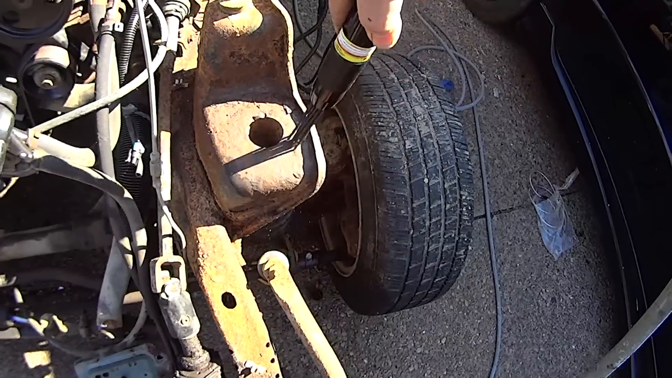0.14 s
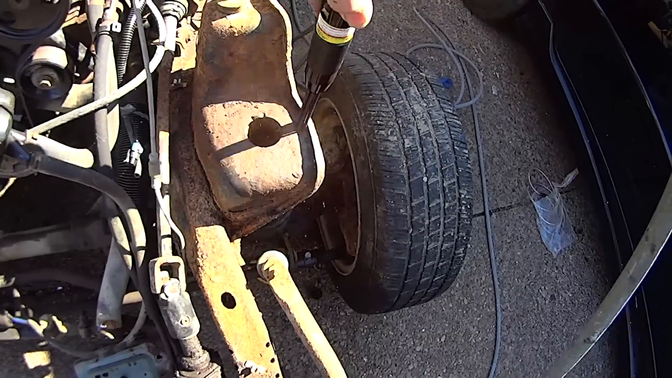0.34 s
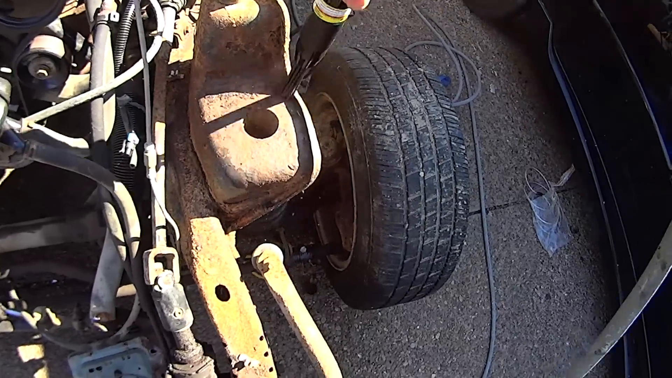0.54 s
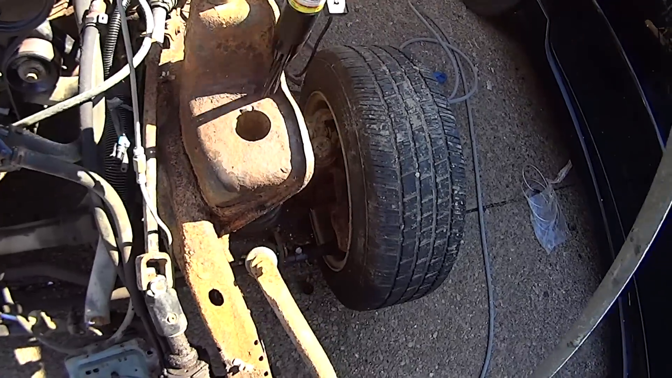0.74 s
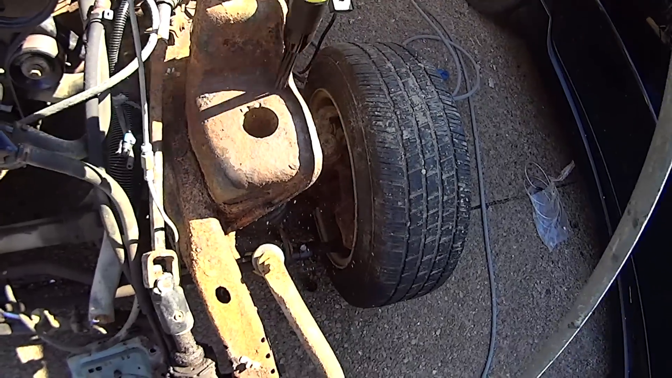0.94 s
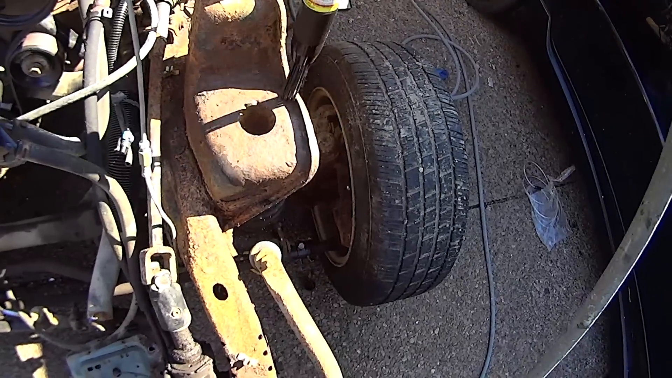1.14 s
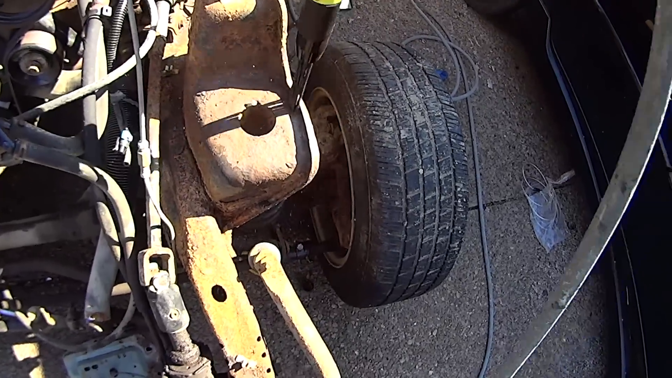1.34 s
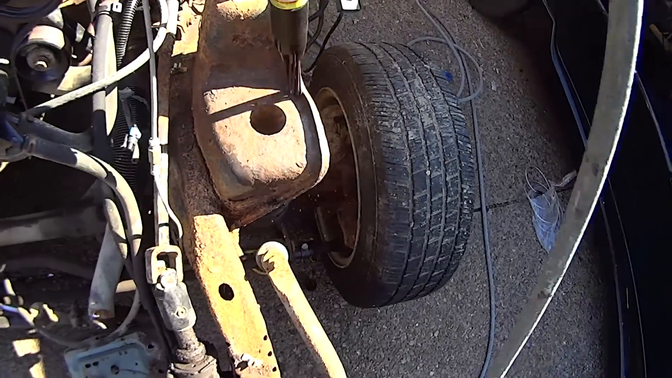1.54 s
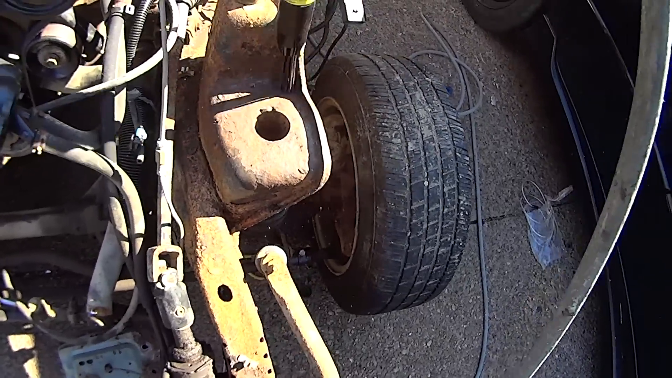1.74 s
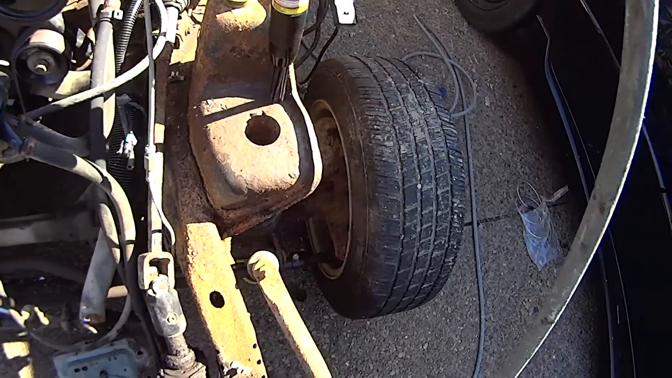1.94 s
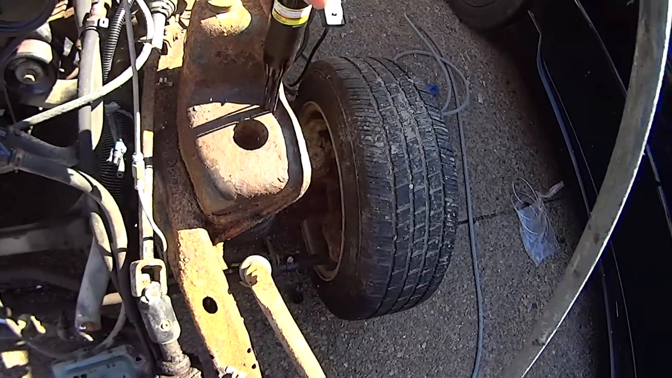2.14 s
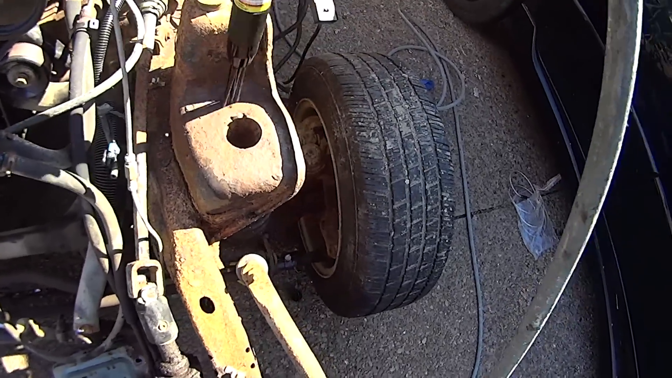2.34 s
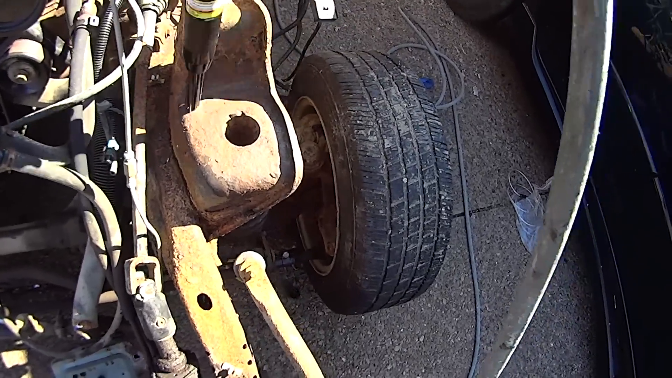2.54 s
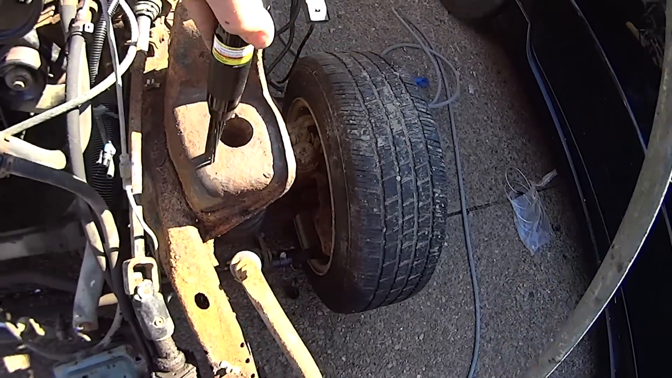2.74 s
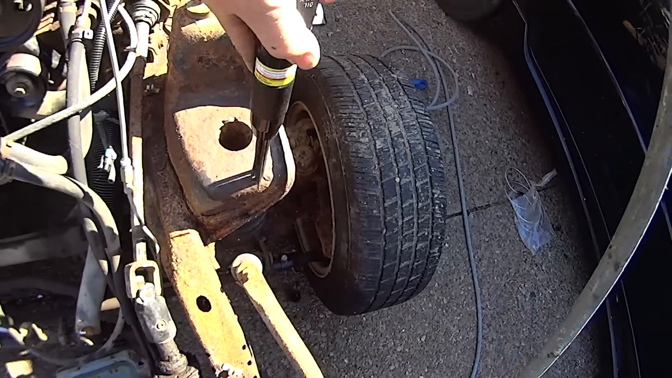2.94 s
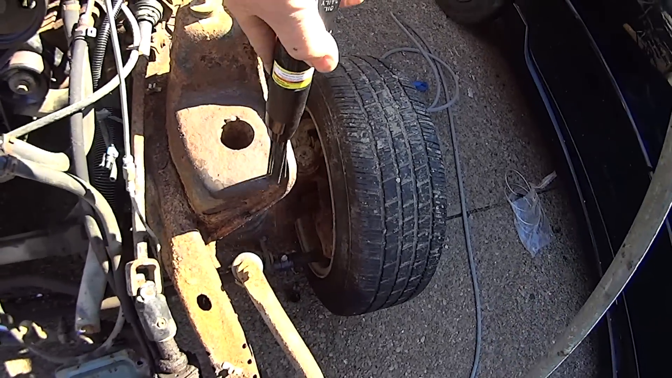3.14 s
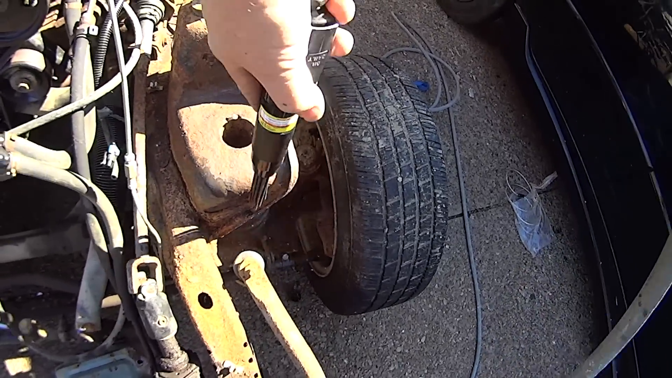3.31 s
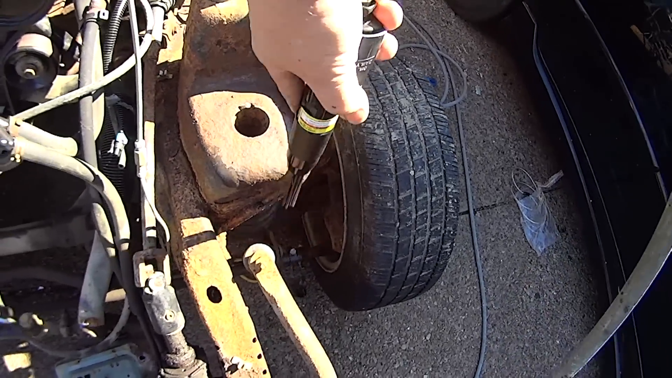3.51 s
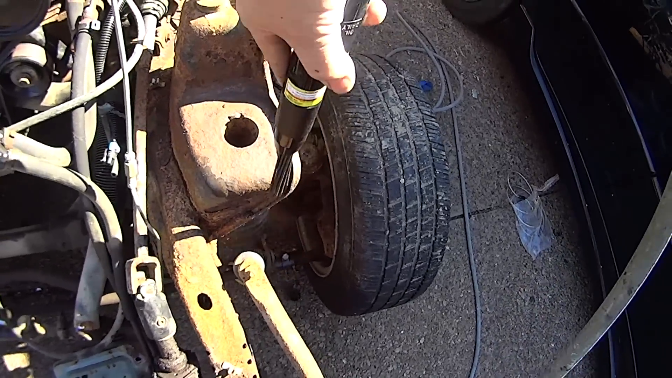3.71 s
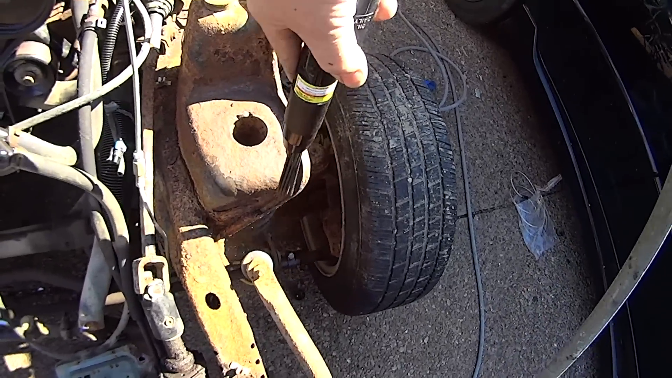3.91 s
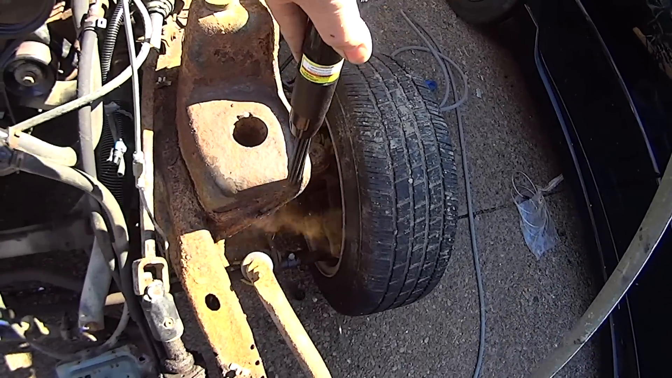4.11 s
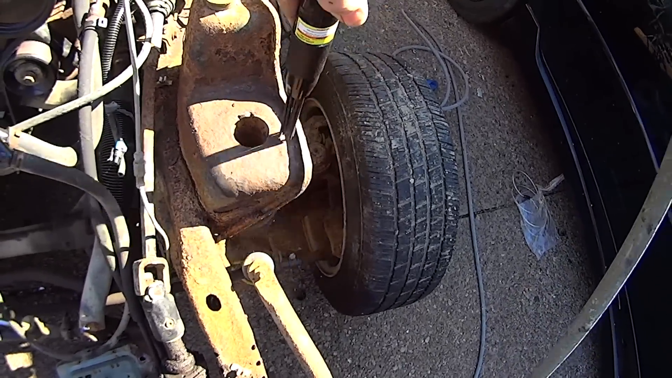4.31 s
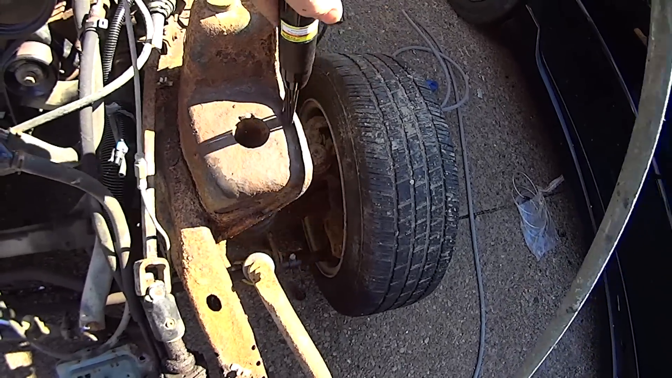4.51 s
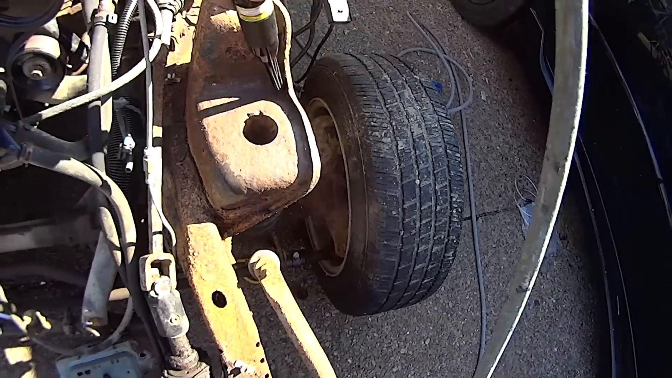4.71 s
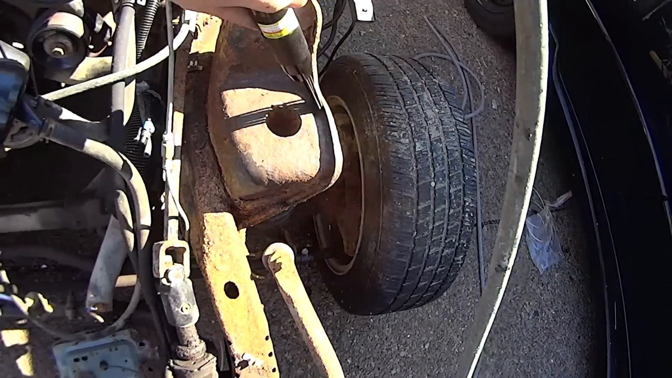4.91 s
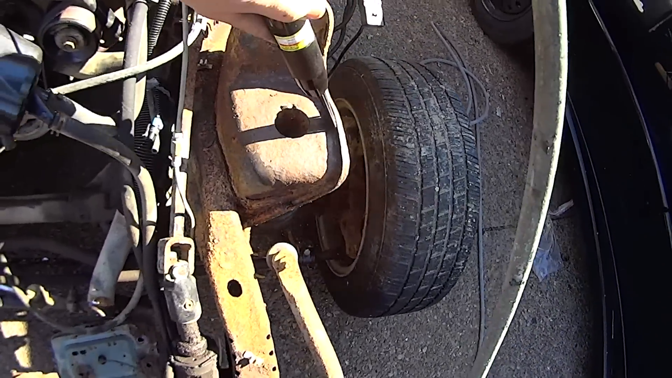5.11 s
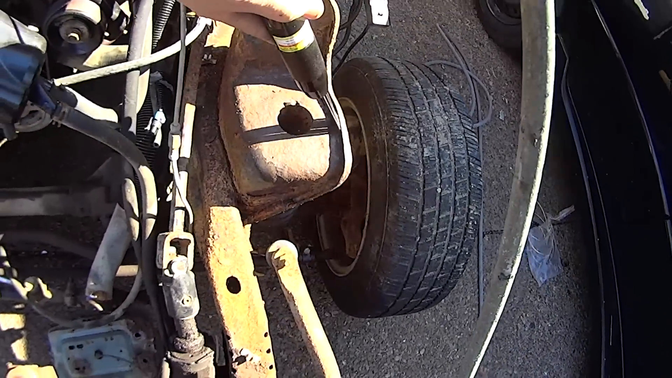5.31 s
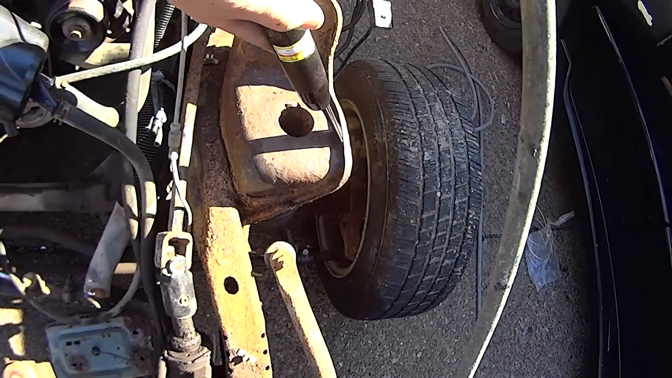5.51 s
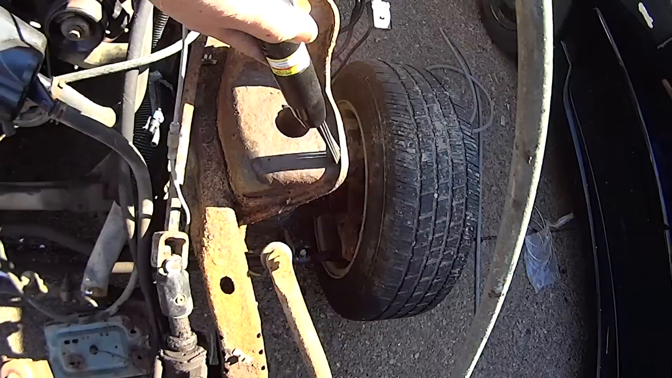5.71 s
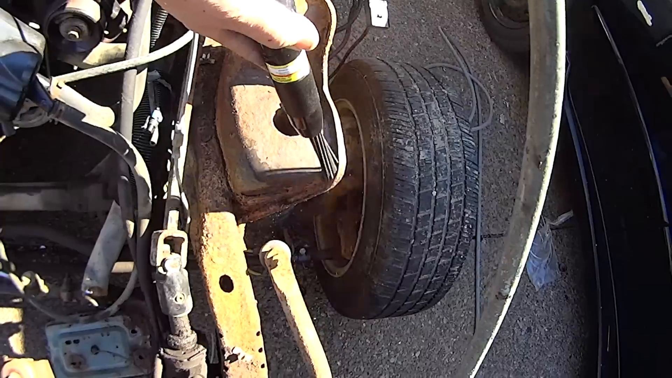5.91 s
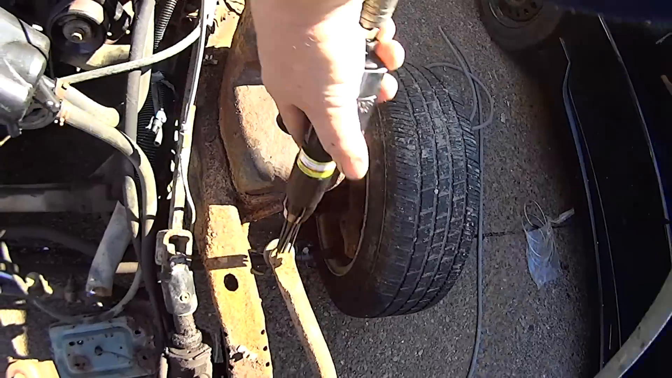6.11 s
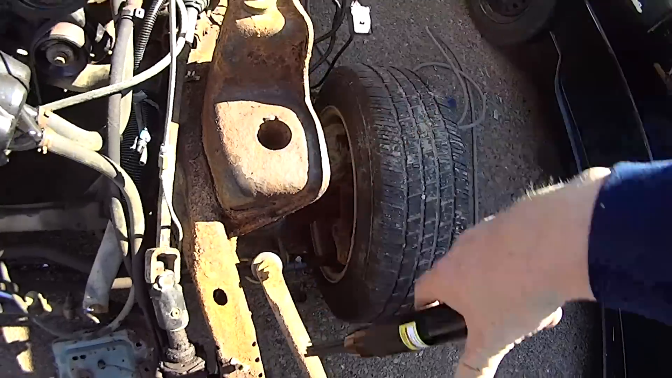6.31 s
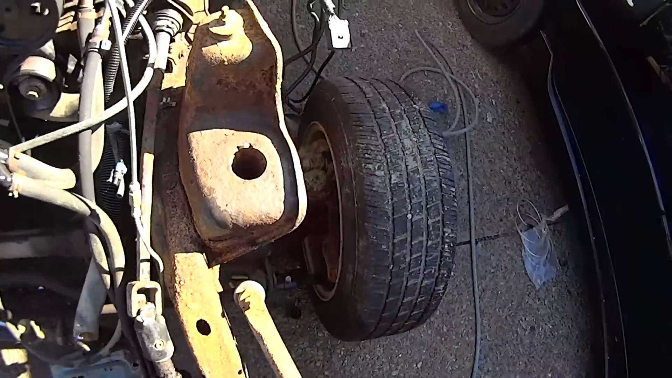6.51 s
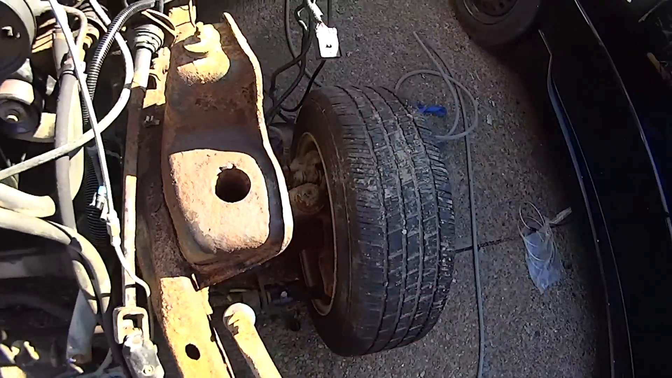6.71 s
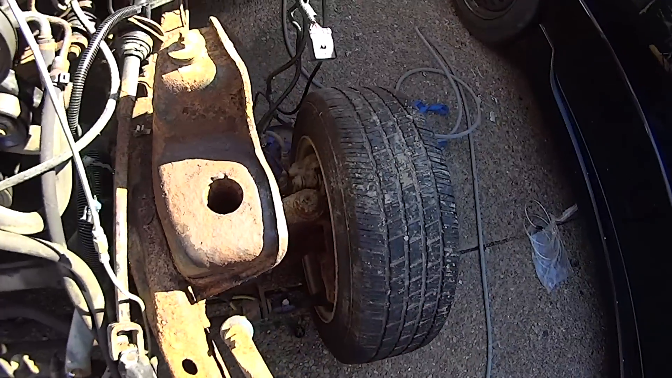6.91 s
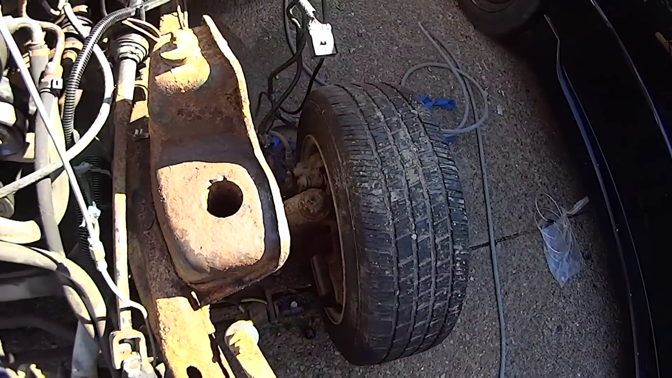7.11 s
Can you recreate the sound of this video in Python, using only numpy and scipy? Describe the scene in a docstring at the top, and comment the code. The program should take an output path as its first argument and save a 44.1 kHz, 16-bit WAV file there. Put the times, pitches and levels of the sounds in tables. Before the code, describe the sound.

An air-driven needle tool chips rust from steel, loud and close. Noisy, hissy metallic chatter runs first, then firm contact brings a rapid hammering drone with the bracket humming and singing. Its tone shifts as it moves over the metal. After six seconds it quits with a brief clink and ring; quiet leaking air, a faint whistle, low buffets and dull camera ticks remain. The surroundings answer only briefly.

```python
"""A pneumatic needle scaler chips rust off a steel vehicle frame, close to a hand-held camera.
Its piston runs at nearly 80 strokes/s: needle contacts ring tool and frame, piston pushes shake body and bracket.
Loose needles first chatter in a dense rasp; pressed home, they hammer in step and the frame rings.
The tool stops with clinks (decaying sines and noise); air seeps on (filtered noise, a whistle, a hum).
Low buffets, bumps and ticks follow as the camera is moved."""
import sys
import numpy as np
from scipy import signal
from scipy.fft import rfft, irfft, next_fast_len
from scipy.io import wavfile
from scipy.ndimage import map_coordinates

SR = 44100
rng = np.random.default_rng(int(sys.argv[2]) if len(sys.argv) > 2 else 0)


def file_out(sig):
    """Save sig as 16-bit WAV at sys.argv[1]."""
    # one column per channel
    cols = np.atleast_2d(sig).T
    # limit, then scale
    lim = np.clip(cols, -1, 1)
    pcm = np.round(lim * 32767).astype(np.int16)
    wavfile.write(sys.argv[1], SR, pcm)


N = 315315

# piston speed: time_s, strokes_per_s
PISTON_SPEED = [(0.0, 77.3), (0.15, 79.46), (0.7, 80.79), (1.05, 78.4), (1.55, 80.5), (1.67, 76.45),
                (1.85, 78.84), (3.14, 78.35), (3.2, 74.9), (3.29, 74.3), (3.32, 75.7), (3.61, 75.5),
                (3.8, 74.2), (3.83, 75.8), (4.04, 75.7), (4.08, 77.9), (4.13, 73.5), (4.17, 77),
                (4.24, 75.9), (4.28, 72.8), (4.33, 72), (4.37, 74.5), (4.48, 73.6), (4.55, 77.9),
                (4.76, 77.6), (4.91, 75.6), (4.96, 77.1), (5.09, 75.4), (5.68, 74.7), (5.81, 76.1),
                (6.07, 75.9), (6.13, 74.4), (6.24, 75)]
# pressing home: time_s, in_step_energy_share (0-1), late_bounce_share of that (0-1)
PRESSURE = [(0, 0.05, 0.77), (3.115, 0.02, 0.9), (3.13, 0.72, 0.55), (3.25, 0.9, 0.24), (3.29, 0.8, 0.03),
            (4.2, 0.84, 0.17), (4.3, 0.77, 0.53), (4.9, 0.82, 0.33), (5.45, 0.77, 0.31), (5.92, 0.81, 0.32),
            (6.05, 0.78, 0)]
# first echo null, lower as the tool moves from the bracket's top to its edge: time_s, null_hz
ECHO_NULL = [(0, 1120), (.3, 1270), (2.6, 1380), (3.1, 1030), (3.35, 680), (4.05, 676), (4.6, 1160),
             (5.2, 1320), (5.95, 967), (6.1, 650)]

# needle spectrum: freq_hz, density_db_per_hz
NEEDLE_SPECTRUM = [(120, -25.5), (300, -11.5), (450, -12), (800, -3.5), (1400, -9), (2200, -4.5),
                   (3000, -2.5), (4000, 2), (4900, 3.5), (5900, 4.5), (7000, 2), (8000, 2), (8800, -0.5),
                   (9700, -2.5), (11000, -7.5)]
# single needle shafts: freq_hz, width_hz, level_db
SHAFT_MODES = [(4460, 110, -6.5), (4620, 82, -6.5), (4980, 180, -2), (5180, 90, -1.5), (6140, 69, -4.5),
               (6860, 94, -2), (6920, 99, -5.5), (8160, 110, 1)]
# crack of a firm blow on steel: freq_hz, width_hz, level_db
CRACK_MODES = [(1540, 1600, -2), (2143, 450, 9.5)]
# barrel: freq_hz, width_hz, level_db
BARREL_MODES = [(7680, 134, -1.3), (10245, 195, -0.22)]
# needle sleeve: freq_hz, width_hz, level_db
SLEEVE_MODES = [(5500, 83, 4.3), (5810, 110, 0.5), (5850, 190, -1.3)]
# needles rub in the sleeve: middle_s, length_s, level_db
SLEEVE_RUBS_TABLE = [(.05, 0.32, -38), (2.75, 0.52, -43.5), (3.2, .16, -45), (3.85, 0.59, -43),
                     (4.35, 0.24, -36), (5.85, 0.18, -40)]

# frame rail, wall: freq_hz, width_hz, level_db
RAIL_WALL_MODES = [(1630, 67, 1), (1743, 22, 12.9), (1882, 59, 4.8), (1964, 49, 4), (2167, 77, 6.9),
                   (2196, 45, 8.4), (2570, 57, 1.3), (2610, 46, 1)]
# frame rail, corner: freq_hz, width_hz, level_db
RAIL_CORNER_MODES = [(1500, 87, 5), (1641, 18, 10), (1870, 62, 11.5), (2065, 37, -1), (2298, 57, 13),
                     (2520, 38, 13)]
# contact place on the rail: time_s, place (0 wall, 1 corner)
RAIL_CONTACT = [(2.65, 0), (2.9, 1), (4.35, 0.96), (4.6, 0), (5.05, 0.24), (5.35, 0.72)]
# needles bite into the rail: middle_s, length_s, level_db
RAIL_BITES_TABLE = [(.18, 0.054, -41), (.35, 0.067, -39.5), (.47, 0.023, -41.5), (.61, 0.028, -41),
                    (.82, 0.21, -45), (1.0, 0.082, -40), (1.17, 0.075, -41.5), (1.38, 0.024, -36),
                    (1.5, 0.049, -42), (1.59, 0.05, -40.5), (1.72, 0.043, -41.5), (1.81, 0.036, -42),
                    (2.01, 0.048, -40), (2.1, .04, -41), (2.18, 0.029, -39.5), (2.29, 0.26, -44),
                    (2.46, .05, -40), (2.57, 0.041, -41.5), (3.02, .17, -39), (3.155, 0.072, -29.5),
                    (3.24, 0.052, -32), (4.295, 0.038, -30.5), (4.82, 0.32, -36), (5.48, 0.14, -49),
                    (5.74, 0.14, -34.5), (5.862, 0.03, -28.5), (5.94, 0.076, -33.5)]
# bracket lip: freq_hz, width_hz, level_db
LIP_MODES = [(3148, 70, 8), (3345, 90, 8.5), (3498, 80, 2)]
# bracket flank: freq_hz, width_hz, level_db
FLANK_MODES = [(2970, 48, 0), (3060, 59, 1), (3540, 29, 3.5), (3640, 22, -8)]
# needles catch the bracket rim: middle_s, length_s, level_db
RIM_BITES_TABLE = [(.26, 0.073, -36.5), (.56, 0.43, -39), (1.33, .09, -35.5), (1.5, 0.21, -39),
                   (1.96, 0.064, -39.5), (2.14, 0.062, -39), (3.16, 0.15, -39.5), (4.56, 0.31, -31),
                   (5.22, 0.45, -39), (5.75, 0.4, -39.5)]

# thud of the tool's body: freq_hz, density_db_per_hz
BODY_SPECTRUM = [(35, -52), (76, -9.5), (115, -12), (152, -2.5), (228, 3.5), (300, 1), (380, 2),
                 (455, 11.5), (530, 4), (605, -7), (760, -2), (950, -28), (1300, -22.5), (3000, -83)]
# bracket top: freq_hz, width_hz, level_db
BRACKET_MODES = [(530, 73, 7.5), (643, 50, 2.5)]
# bracket's flat face: freq_hz, width_hz, level_db
FACE_MODES = [(974, 42, 2), (1076, 76, 4), (1172, 52, 0), (1242, 35, 2)]
# needles drum on the face: middle_s, length_s, level_db
FACE_DRUMS_TABLE = [(3.47, 0.12, -42.5), (4.82, 0.26, -37.5)]
# bracket's outer edge: freq_hz, width_hz, level_db
EDGE_MODES = [(518, 44, 4.5), (768, 17, 11), (900, 18, -9), (1208, 63, -1), (1480, 210, -12.5),
              (3135, 59, 5)]
# needles slip off the bracket, which falls quieter: middle_s, length_s, gain_db
BRACKET_SLIPS = [(0.083, 0.19, -5), (2.927, 0.35, -3.5)]
# bracket hum while the tool is seated on it: time_s, level_db
SEATED_HUM = [(4.45, -65), (4.57, -50), (4.85, -44.5), (5.1, -44.5), (5.5, -47), (5.95, -46.5), (6.12, -49)]
# seated hum: freq_hz, width_hz, level_db
SEATED_MODES = [(542, 40, -7), (611, 30, 0)]
# bracket's plate sings under the seated tool, higher as it moves in: time_s, pitch_hz, level_db
PLATE_SONG = [(4.25, 930, -73), (4.4, 950, -49), (4.6, 975, -52), (4.85, 1032, -54), (5.1, 1020, -40.5),
              (5.5, 1030, -51), (5.85, 1020, -49), (6.1, 990, -56)]

# needles settle: time_s, relative_db
CLINK_EVENTS = [(6.232, -22.5), (6.24, -33), (6.294, -26.5), (6.315, -38)]
# needle bundle in the clinks: freq_hz, level_db, t60_s
BUNDLE_MODES = [(775, 3, .07), (1200, 1, .04), (3380, -5, .035), (5290, -2, .028), (6200, -9, .025),
                (7725, -8, .055), (10260, -10, .055)]
# barrel rings out once the needles are free: freq_hz, relative_db, t60_s
RING_OUT_MODES = [(7690, -27, 0.11), (10220, -26, 0.085)]

# seeping air: freq_hz, density_db_per_hz
SEEP_SPECTRUM = [(180, -47), (300, -23), (437, -9), (532, -17), (836, -11), (1350, -15.5), (1720, -11),
                 (2190, -6.5), (3060, -13.5), (6020, -10.5), (7550, -8.5), (9600, -8.5), (11000, -12),
                 (14300, -40), (22000, -120)]
# leak hiss shifts in pitch as the pressure settles: time_s, center_hz, db_re_seep
LEAK_HISS = [(6.33, 10000, 0), (6.42, 9000, -5), (6.49, 7250, -2), (6.62, 7540, -5), (6.85, 7900, -14),
             (7.0, 8400, -4), (7.15, 8400, 1)]
# air buffets the microphone: middle_s, length_s, gain_db
BUFFET_SWELLS = [(6.735, 0.069, -55), (6.96, 0.083, -53), (7.09, .06, -47), (7.14, .04, -56)]
# buffet rumble: freq_hz, density_db_per_hz
RUMBLE_SPECTRUM = [(20, -16), (50, 3), (120, 8.5), (200, 6.5), (300, -0.5), (450, -10), (700, -33),
                   (1500, -47)]
# soft handling bumps: time_s, start_db, pitch_hz
HANDLING_BUMPS = [(6.674, -42, 200), (6.693, -37, 260), (6.708, -38, 170), (6.724, -44, 150),
                  (6.734, -39, 196), (6.765, -46, 220), (6.925, -49, 160), (6.949, -42, 170),
                  (6.966, -36, 191), (6.992, -42, 160), (7.073, -38, 200), (7.094, -31, 130),
                  (7.103, -32, 150)]
# small dull ticks: time_s, level_db
HANDLING_TICKS = [(6.722, -52), (6.818, -53), (6.912, -40)]
# tick spectrum: freq_hz, density_db_per_hz
TICK_SPECTRUM = [(400, -8), (700, 0), (850, 6), (1000, -6), (1300, -1), (1800, -26), (4000, -45)]

# microphone ports, level: freq_hz, left_minus_right_db
PORT_TILT = [(100, -1.5), (260, -1), (450, 1), (700, 1.5), (900, 2.5), (1500, 3), (2100, 4.5), (2800, 1.7),
             (5000, -0.5), (11000, 0.5)]
# microphone ports, phase: freq_hz, left_lead_rad
PORT_LEAD = [(80, 0.36), (200, 0.35), (350, 1), (600, 0.48), (780, 0.91), (1100, 0.34), (1600, 0.11),
             (2200, 0)]
# stereo width of the diffuse sound, opposite in left and right, very narrow at 5.5-8 kHz: freq_hz, gain_db
WIDTH_GAIN = [(100, -21), (550, -18), (850, -8), (1800, -11.5), (3700, -13), (5500, -44), (7900, -44),
              (8500, -22), (11000, -13.5)]
# garage decay: freq_hz, t60_s
GARAGE_T60 = [(200, 0.37), (2000, 0.063), (10000, 0.039)]

# _DB: with loose needles; _PRESS_DB: added by full pressure
NEEDLE_DB, NEEDLE_PRESS_DB = -32, 2.5
BOUNCE_DB = 9.5  # added under full pressure when all blows are late bounces
SHAFTS_DB, SHAFTS_VARY_DB = -14.5, 3  # against the bundle; spread of the wander's knots
BARREL_DB, BARREL_PRESS_DB = -39.5, 7
BARREL_EDGE_DB, BARREL_WAVER_DB = 1, 1.2  # added on the bracket's edge; spread of the waver's knots
SLEEVE_DB, SLEEVE_PRESS_DB = -56, 10
RAIL_DB, RAIL_PRESS_DB = -49.5, 1.5
LIP_DB, LIP_PRESS_DB = -49, -3
BODY_DB, BODY_PRESS_DB = -47.5, 8
BRACKET_DB, BRACKET_PRESS_DB = -47.5, 9.5
FACE_DB, FACE_PRESS_DB = -51.5, -6
EDGE_DB, EDGE_PRESS_DB = -48.5, 13
OUTWARD_DB = -3.5  # change of bracket top and face with the needles out on the edge
EDGE_NULL_HZ, TOP_NULL_HZ = 620, 1210  # echo null on the edge, on the top
FLANK_S, FLANK_TAKES_S = 4.88, 0.35  # needles move from the bracket's lip down to its flank
FLANK_SHARE_BEFORE, FLANK_SHARE_AFTER = 0.15, 1
RETURN_CYCLES, RETURN_SCATTER_CYCLES = .45, .14  # when the needles bounce
BLOW_SCATTER_DB, HEAD_SCATTER_DB = 1.1, 2.5  # spread of the blows at needle tips, at heads
FIRM_ROUGH, LOOSE_ROUGH = .25, 0.89  # noise in the push when firm; added with loose needles
PLATE_WIDTH_HZ = 54
STOP_S = 6.24  # the trigger is let go
SEEP_GAIN_DB, SEEP_EXCESS_DB, SEEP_FADE_S = -65.5, 10.5, 0.13  # settled; excess until the stop; time constant
WHISTLE_HZ, WHISTLE_SAG_HZ_PER_S = 2340, 440
WHISTLE_KNOTS_PER_S, WHISTLE_DB = 170, -8.5  # wobble rate; gain against the seep
LEAK_WIDTH_HZ = 1100
RUMBLE_REST_DB = -72.5  # gain between the buffets
SWAY_KNOTS_PER_S = 2.5  # how fast the hand-held camera changes the reflections
TOP_HZ = 11080


def scaler():
    """Needle contacts ring tool and frame; the piston shakes the heavier parts until the trigger is let go."""
    press, bouncy = np.clip(curves(PRESSURE), 0, 1)
    starts, periods = strokes()
    hits = contacts(starts, periods, spread_s=.0006, scatter_db=BLOW_SCATTER_DB,
                    shiver_db=-3.0, shiver_decay_s=0.0093, count=44)
    heads = contacts(starts, periods, spread_s=0.00089, scatter_db=HEAD_SCATTER_DB,
                     shiver_db=3.5, shiver_decay_s=0.016, count=26)
    push = piston(starts, periods, press, back_share=.5, back_db=-8, back_press_db=-3.5, rough=0.15)
    work = tool(hits, heads, press, bouncy) + frame(hits, press) + buzz(push, hits, press) + seated(push)
    running = amp(-60 * np.maximum(np.arange(N) / SR - STOP_S, 0) / .06)
    return running * glancing(work, echo_db=-12.5, corner_hz=2740)


def strokes():
    """Start time and length of every piston cycle, with slight timing jitter."""
    rate, = curves(PISTON_SPEED)
    turns = np.cumsum(rate) / SR
    at = np.searchsorted(turns, np.arange(1, int(turns[-1])))
    return at / SR + rng.normal(0, .00007, len(at)), 1 / rate[at]


def contacts(starts, periods, spread_s, scatter_db, shiver_db, shiver_decay_s, count):
    """Each blow throws the needles at the steel almost together; they shiver, and bounce as the piston returns."""
    press, bouncy = np.clip(curves(PRESSURE), 0, 1)
    shape = (len(starts), count)
    force = amp(scatter_db * rng.standard_normal((len(starts), 1)))

    def cluster(at):
        times = at[:, None] + spread_s * rng.exponential(size=shape)
        return unit(impulses(times, force * rng.choice([-1, 1], shape)))

    def bounce():
        late = RETURN_CYCLES + RETURN_SCATTER_CYCLES * rng.standard_normal(len(starts))
        return cluster(starts + periods * late)

    blow = cluster(starts)
    blow = unit(blow + amp(-14.0) * rung(blow, [(5500, 4100, 0)]))  # shafts snap in the mid treble
    bounces = unit(sum(bounce() for _ in range(4)))
    t = np.arange(N) / SR
    age = np.abs(t - starts[np.maximum(np.searchsorted(starts, t) - 1, 0)])
    shiver = unit(np.exp(-age / shiver_decay_s) * rng.standard_normal(N))
    in_step = np.sqrt(1 - bouncy) * blow + np.sqrt(bouncy) * bounces + amp(shiver_db) * shiver
    in_step = in_step / np.hypot(1, amp(shiver_db))
    # loose contacts are so dense that they merge with the exhaust into a rasp
    return np.sqrt(press) * in_step + np.sqrt(1 - press) * rng.standard_normal(N)


def piston(starts, periods, press, back_share, back_db, back_press_db, rough):
    """Opposite pushes on blow and return; pressure cushions the return, so even harmonics fill in."""
    size = 1 + rough * rng.standard_normal((2, len(starts)))
    returns = starts + periods * (back_share + rng.normal(0, .008, len(starts)))
    back = amp(back_db + back_press_db * press) * impulses(returns, size[1])
    return unit(impulses(starts, size[0]) - back)


def tool(hits, heads, press, bouncy):
    """Needles ring from their tips, the barrel from their heads; firm blows add a broad, lower crack."""
    needle_db = NEEDLE_DB + press * (NEEDLE_PRESS_DB + BOUNCE_DB * bouncy) + 0.38 * wobble(11)
    bundle = coloured(hits, NEEDLE_SPECTRUM)
    shafts = amp(SHAFTS_DB) * rung(hits, SHAFT_MODES, vary_db=SHAFTS_VARY_DB)
    crack = amp(-10.5) * press * rung(hits, CRACK_MODES)
    barrel_db = BARREL_DB + BARREL_PRESS_DB * press + BARREL_EDGE_DB * on_edge() + BARREL_WAVER_DB * wobble(10)
    barrel = amp(barrel_db) * rung(heads, BARREL_MODES)
    sleeve = swells(SLEEVE_RUBS_TABLE, SLEEVE_DB + SLEEVE_PRESS_DB * press) * rung(hits, SLEEVE_MODES)
    return amp(needle_db) * (bundle + shafts + crack) + barrel + sleeve


def frame(hits, press):
    """Rail and bracket rim ring out where the needles bite; the place chooses the modes."""
    corner = np.clip(curves(RAIL_CONTACT)[0], 0, 1)
    rail = np.sqrt(1 - corner) * rung(hits, RAIL_WALL_MODES) + np.sqrt(corner) * rung(hits, RAIL_CORNER_MODES)
    move = (np.arange(N) / SR - FLANK_S) / FLANK_TAKES_S
    flank = np.interp(move, [-.5, .5], [FLANK_SHARE_BEFORE, FLANK_SHARE_AFTER])
    rim = (1 - flank) * rung(hits, LIP_MODES) + flank * rung(hits, FLANK_MODES)
    rail_gain = swells(RAIL_BITES_TABLE, RAIL_DB + RAIL_PRESS_DB * press)
    rim_gain = swells(RIM_BITES_TABLE, LIP_DB + LIP_PRESS_DB * press)
    return rail_gain * unit(rail) + rim_gain * unit(rim)


def buzz(push, hits, press):
    """The piston shakes body and bracket; loose needles pass the push on less regularly."""
    passed_on = push + (FIRM_ROUGH + LOOSE_ROUGH * (1 - press)) * rng.standard_normal(N)
    struck = passed_on + .5 * hits
    outward = on_edge()
    body = amp(BODY_DB + BODY_PRESS_DB * press) * coloured(push + 0.43 * hits, BODY_SPECTRUM)
    bracket_db = BRACKET_DB + BRACKET_PRESS_DB * press + OUTWARD_DB * outward
    bracket = amp(bracket_db) * rung(passed_on, BRACKET_MODES)
    face_db = FACE_DB + FACE_PRESS_DB * press + OUTWARD_DB * outward
    face = swells(FACE_DRUMS_TABLE, face_db) * rung(struck, FACE_MODES)
    edge = outward * amp(EDGE_DB + EDGE_PRESS_DB * press) * rung(struck, EDGE_MODES)
    grip = amp(sum(db * bell(s, length) for s, length, db in BRACKET_SLIPS))
    return body + grip * (bracket + face + edge)


def seated(push):
    """Seated firmly, the tool passes every stroke on cleanly, and the bracket hums and sings."""
    hum_db, = curves(SEATED_HUM)
    plate_hz, plate_db = curves(PLATE_SONG)
    hum = amp(hum_db) * rung(push, SEATED_MODES)
    return hum + amp(plate_db) * gliding(push, plate_hz, PLATE_WIDTH_HZ)


def on_edge():
    """Where the tool works: 0 on the bracket's top, 1 out on its edge."""
    return np.interp(curves(ECHO_NULL)[0], [EDGE_NULL_HZ, TOP_NULL_HZ], [1, 0])


def glancing(x, echo_db, corner_hz):
    """A close, dulled reflection, its path changing with the tool's position, sweeps a comb through x."""
    null_hz, = curves(ECHO_NULL)
    n = np.arange(N)
    dulled = filtered(x, lambda hz: 1 / (1 + (hz / corner_hz) ** 2))
    echo = np.interp(n - SR / (2 * null_hz), n, dulled)  # half a period late at the null
    return x + amp(echo_db) * echo


def clinks():
    """The last weak strokes drop the needles back into their sleeve, and the barrel rings out."""
    t = np.arange(SR // 4) / SR

    def ringing(modes):
        total = np.zeros(len(t))
        for hz, db, t60 in modes:
            decay = amp(db + rng.normal(0, 1) - 60 * t / t60)
            total += decay * np.sin(2 * np.pi * (hz * t + rng.random()))
        return total

    out = np.zeros(N)
    for s, db in CLINK_EVENTS:
        noise = signal.lfilter(*signal.butter(1, 7000, fs=SR), rng.standard_normal(len(t)))
        crack = 3.1 * amp(-60 * t / 0.035) * noise
        out[round(s * SR):][:len(t)] += amp(db - 14.5) * (ringing(BUNDLE_MODES) + crack)
    out[round(STOP_S * SR):][:len(t)] += ringing(RING_OUT_MODES) * amp(5) * (1 - np.exp(-t / .012))
    return out


def garage(x):
    """A short diffuse answer from floor and bodywork, different at each port."""
    hz, t, z = signal.stft(rng.standard_normal((2, SR // 3)), SR, nperseg=256)
    tail = signal.istft(z * amp(-60 * t / along(GARAGE_T60, hz)[:, None]), SR, nperseg=256)[1]
    delayed = np.pad(x, (200, 0))[None]
    return signal.fftconvolve(delayed, tail / np.linalg.norm(tail[0]), axes=1)[:, :N]


def ports(x):
    """Ports differ slightly in level and phase; diffuse sound, opposite in each, shifts as the camera sways."""
    side = np.array([[.5], [-.5]])
    direct = filtered(x, lambda hz: amp(side * along(PORT_TILT, hz)) * np.exp(1j * side * along(PORT_LEAD, hz)))
    t = np.arange(SR // 25) / SR
    echoes = rng.standard_normal((2, len(t))) * (t > .002) * amp(-60 * t / 0.049)
    first, second = signal.oaconvolve(x[None], echoes / np.linalg.norm(echoes[0]), axes=1)[:, :N]
    sway = np.pi * wobble(SWAY_KNOTS_PER_S)
    mix = np.cos(sway) * first + np.sin(sway) * second
    diffuse = filtered(mix, lambda hz: amp(along(WIDTH_GAIN, hz)))
    return direct + 2 * side * diffuse


def idle():
    """Air seeps from the coupling with a shifting hiss and a faint whistle; after the stop a low hum fades."""
    t = np.arange(N) / SR
    since = np.maximum(t - STOP_S, 0)
    seep = coloured(rng.standard_normal((2, N)), SEEP_SPECTRUM)
    turn = 2 * np.pi * np.cumsum(WHISTLE_HZ - WHISTLE_SAG_HZ_PER_S * since) / SR
    whistle = wobble(WHISTLE_KNOTS_PER_S) * np.sin(turn) + wobble(WHISTLE_KNOTS_PER_S) * np.cos(turn)
    leak_hz, leak_db = curves(LEAK_HISS)
    leak = amp(leak_db) * gliding(rng.standard_normal(N), leak_hz, LEAK_WIDTH_HZ)
    hum_gain = amp(-53.0 - 29 * since) * (1 - np.exp(-since / 0.0057))
    hum = hum_gain * np.sin(2 * np.pi * 183 * t + .2 * wobble(23))
    seep_db = SEEP_GAIN_DB + SEEP_EXCESS_DB * np.exp(-since / SEEP_FADE_S)
    air = 0.83 * seep.mean(0) + 0.95 * seep + leak + amp(WHISTLE_DB) * unit(whistle)
    return amp(seep_db) * air + hum


def handling():
    """The camera is moved: noise buffets, decaying sine bumps and a few dull ticks."""
    rumble = coloured(rng.standard_normal((2, N)), RUMBLE_SPECTRUM)
    buffets = swells(BUFFET_SWELLS, RUMBLE_REST_DB) * (0.41 * rumble.mean(0) + 1.84 * rumble)
    bumps, t = np.zeros(N + SR), np.arange(SR // 10) / SR
    for s, db, hz in HANDLING_BUMPS:
        bumps[round(s * SR):][:len(t)] += amp(db - 12 * hz * t) * np.sin(2 * np.pi * hz * t)
    s, db = np.transpose(HANDLING_TICKS)
    ticks = coloured(impulses(s, amp(db)), TICK_SPECTRUM)
    return buffets + bumps[:N] + amp(db.max()) * ticks / np.abs(ticks).max()


def amp(db):
    """Decibels to gain."""
    return 10 ** (np.asarray(db) / 20)


def unit(x):
    """Scale to rms 1."""
    return x / np.sqrt(np.mean(x ** 2) + 1e-20)


def along(points, hz):
    """(freq_hz, value) points read on a log axis."""
    f, v = np.transpose(points)
    return np.interp(np.log(hz + 1), np.log(f + 1), v)


def curves(rows):
    """One value per sample for each column after the time."""
    s, *cols = np.transpose(rows)
    return [np.interp(np.arange(N) / SR, s, c) for c in cols]


def wobble(knots_per_s):
    """A smooth random curve through normal knots."""
    knots = rng.standard_normal(int(N * knots_per_s / SR) + 4)
    return map_coordinates(knots, [np.arange(N) * knots_per_s / SR])


def bell(s, length):
    """A rounded rise and fall of height 1 around s, half as high at the ends of its length."""
    out = np.zeros(N)
    near = np.arange(max(0, int((s - 3 * length) * SR)), min(N, int((s + 3 * length) * SR)))
    out[near] = .5 ** np.square(2 * (near / SR - s) / length)
    return out


def swells(rows, rest_db):
    """A resting gain, power-summed with a swell for each (middle_s, length_s, level_db) row."""
    return np.sqrt(amp(rest_db) ** 2 + sum((amp(db) * bell(s, length)) ** 2 for s, length, db in rows))


def impulses(times, sizes):
    """A train of single contacts."""
    at = np.clip(np.round(np.ravel(times) * SR).astype(int), 0, N)
    return np.bincount(at, np.ravel(sizes), N + 1)[:N]


def filtered(x, response):
    """x times a complex response of frequency."""
    m = 2 * next_fast_len(N // 2 + SR // 4)
    return irfft(rfft(x, m) * response(np.fft.rfftfreq(m, 1 / SR)), m)[..., :N]


def coloured(x, spectrum):
    """x through a causal (minimum-phase) filter with the given spectrum, at rms 1."""
    def response(hz):
        cepstrum = irfft(np.log(amp(along(spectrum, hz))))
        cepstrum[1:len(hz) - 1] *= 2  # fold onto positive time
        cepstrum[len(hz):] = 0
        return np.exp(rfft(cepstrum))
    return unit(filtered(x, response))


def rung(x, modes, vary_db=0):
    """x through resonances of alternating sign, at rms 1; each may swell and fade as the needles wander."""
    out = np.zeros(N)
    for k, (hz, width_hz, db) in enumerate(modes):
        swell_db = vary_db * wobble(7) if vary_db else 0
        resonance = signal.lfilter(*signal.iirpeak(hz, hz / width_hz, SR), x)
        out += (-1) ** k * amp(db + swell_db) * resonance
    return unit(out)


def gliding(x, hz, width_hz):
    """x through one resonance whose pitch moves (shift to 0 Hz, low-pass, shift back), at rms 1."""
    turn = np.exp(2j * np.pi * np.cumsum(hz) / SR)
    return unit(np.real(turn * signal.lfilter(*signal.butter(2, width_hz / 2, fs=SR), x / turn)))


def scene():
    """The tool in its surroundings, and the quiet after it."""
    work = scaler() + clinks()
    return ports(work) + amp(-20.5) * garage(work) + idle() + handling()


def record(dry):
    """The camera rounds off the highest peaks and keeps nothing above its band limit."""
    rounded = dry / (1 + np.abs(dry / .3) ** 4) ** (1 / 4)
    return filtered(rounded, lambda hz: hz < TOP_HZ)


dry = scene()
out = record(dry)
file_out(out)
```